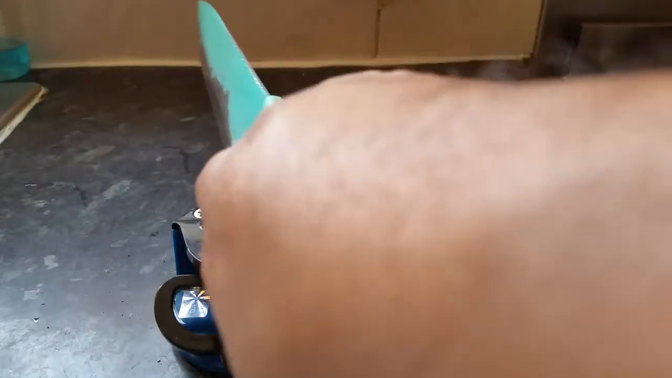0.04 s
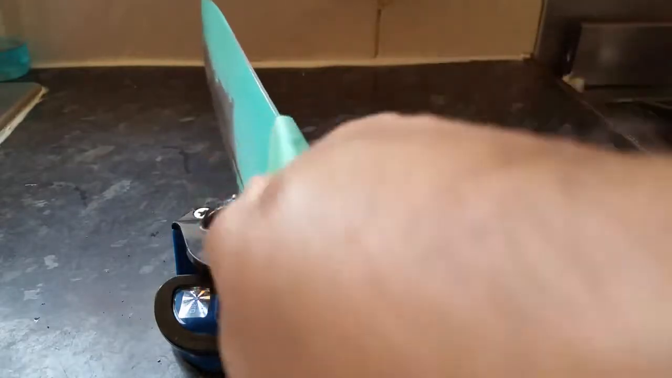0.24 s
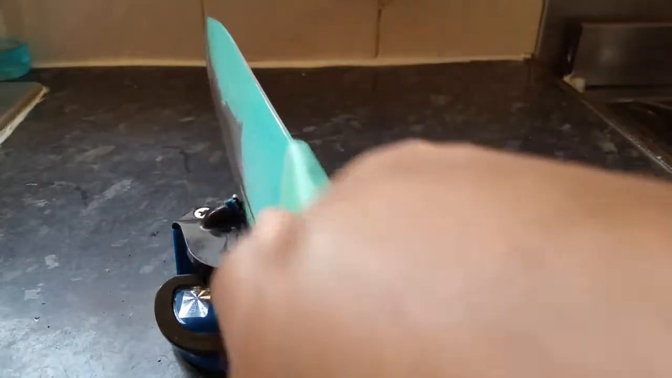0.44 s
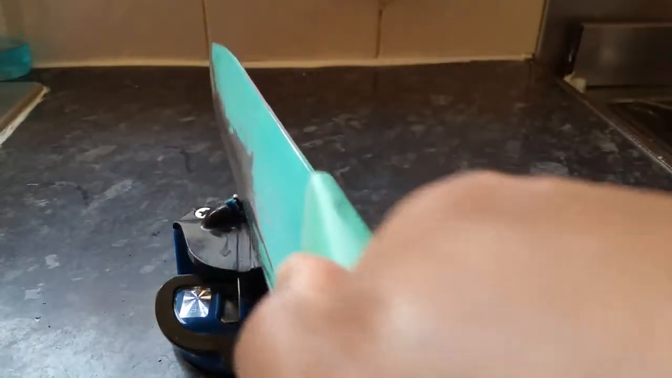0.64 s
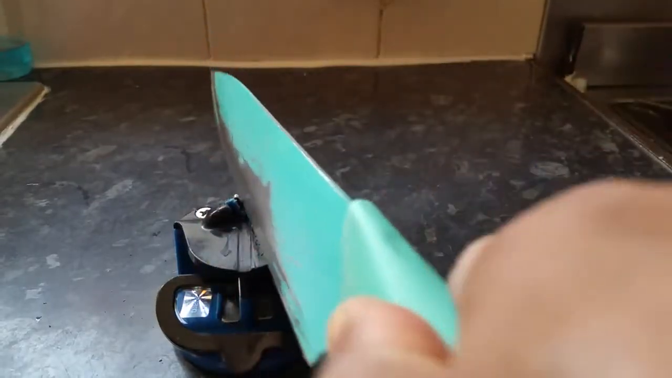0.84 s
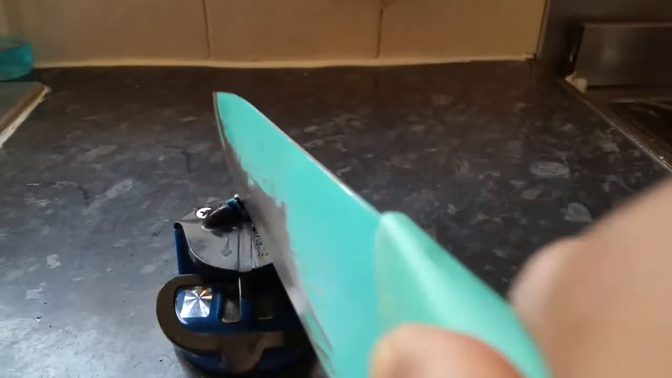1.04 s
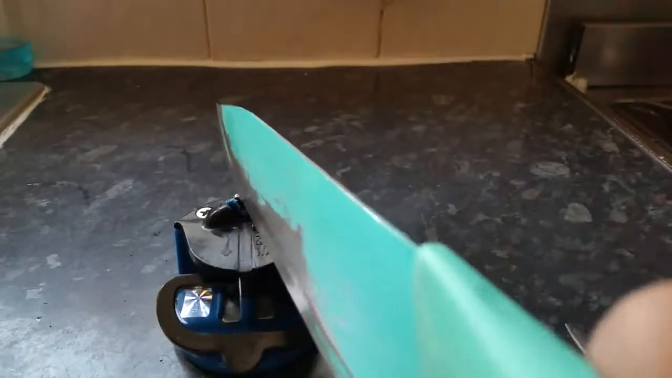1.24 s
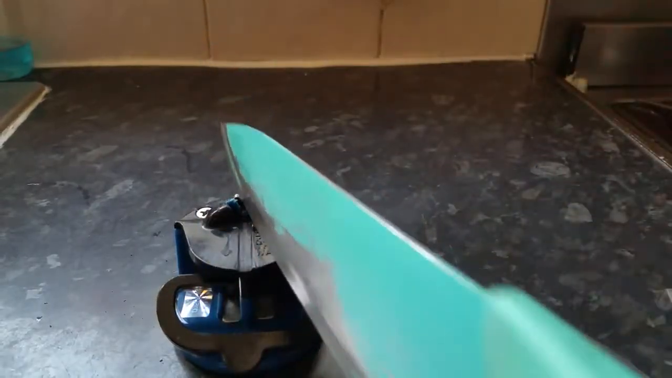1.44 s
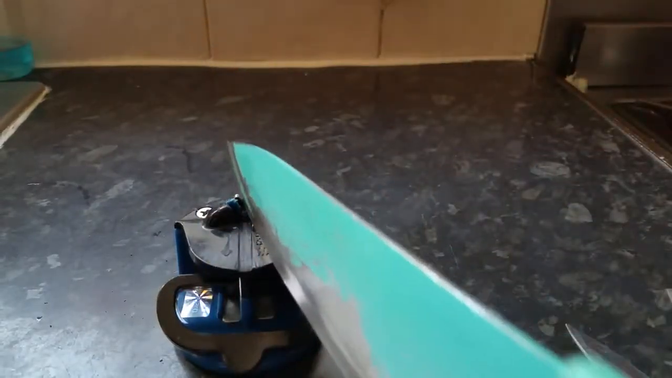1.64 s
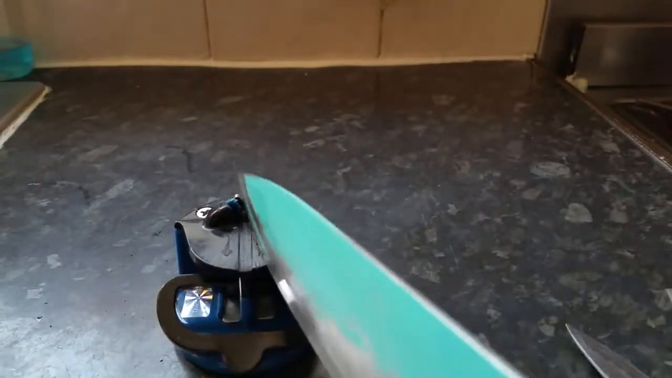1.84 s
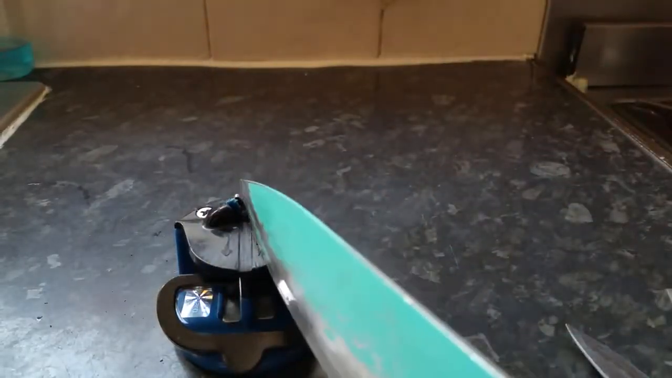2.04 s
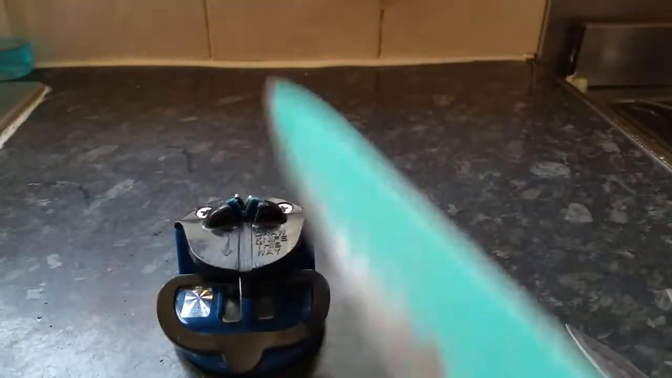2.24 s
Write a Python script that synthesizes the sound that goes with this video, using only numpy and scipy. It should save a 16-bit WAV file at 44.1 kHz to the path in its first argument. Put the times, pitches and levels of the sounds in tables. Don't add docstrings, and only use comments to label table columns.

```python
import sys
import numpy as np
from scipy import signal
from scipy.io import wavfile

SR = 44100
rng = np.random.default_rng(int(sys.argv[2]) if len(sys.argv) > 2 else 0)


def generate_wav(signal):
    frames = np.transpose(np.atleast_2d(signal))
    scaled = np.clip(frames, -1, 1) * 32767
    pcm = np.round(scaled).astype(np.int16)
    wavfile.write(sys.argv[1], SR, pcm)


def nominal_scale(level):
    x = np.asarray(level, float) / 20
    return 10 ** x


N = 101430
TIME = np.arange(N) / SR

# (time [s], grinding level [dB], downward load as thump over grit [dB])
PULL_CURVE = [(0.0, -71.5, 23), (0.144, -69.5, 22.5), (0.236, -48.5, 19), (0.268, -35.5, 19.5),
              (0.322, -27, 11), (0.366, -45, 27), (0.548, -29, 8.5), (0.684, -37, 6), (0.72, -30.5, 13),
              (1.088, -36.5, 3.5), (1.124, -36.5, 1), (1.212, -33.5, 0.5), (1.352, -45, 13.5),
              (1.378, -37.5, 3.5), (1.556, -33.5, 4.5), (1.658, -45, 2.5), (1.75, -34, -8.5),
              (1.935, -41, 4.5)]
# (time [s], grit peak [dB], thump [dB])
HEEL_CATCHES = [(0.1757, -40.5, -42), (0.196, -33.5, -40), (0.2254, -25, -32), (0.2364, -25.5, -36),
                (0.2448, -31, -21), (0.2549, -25, -21), (0.2669, -16.5, -26), (0.2774, -10.5, -29),
                (0.286, -23, -24), (0.306, -12, -17), (0.3156, -14.5, -17), (0.3263, -14.5, -14.5),
                (0.336, -10, -12), (0.398, -15.5, -24), (0.421, -30, -42), (0.431, -18, -15),
                (0.442, -24, -34), (0.457, -18, -33), (0.465, -18.5, -15.5), (0.4738, -16, -17.5),
                (0.483, -10, -9.5), (0.4966, -12, -11), (0.5092, -11, -18), (0.5179, -11, -11.5),
                (0.526, -20, -23), (0.5347, -12, -12), (0.5449, -10.5, -35), (0.55, -13, -17)]
# (time [s], grit peak [dB], thump [dB])
EDGE_SNAGS = [(0.56, -22, -15.5), (0.5685, -12.5, -32), (0.5856, -12, -22.0), (0.595, -13, -16.5),
              (0.6362, -8, -20), (0.6499, -8.5, -26), (0.66, -12.5, -22), (0.6767, -12, -23),
              (0.6964, -23, -23.0), (0.706, -24, -23), (0.7146, -29, -18.5), (0.7325, -12, -22),
              (0.7474, -19, -40), (0.7569, -22, -20), (0.7856, -22, -25), (0.8025, -18, -19),
              (0.8137, -24, -31), (0.8231, -15, -18.5), (0.8491, -10, -23), (0.877, -15.5, -26),
              (0.8864, -15, -36), (0.9234, -16, -28), (0.9322, -17, -39), (0.9402, -19.5, -29),
              (0.9646, -17, -30), (0.984, -18.0, -43), (0.9986, -14.5, -34), (1.0161, -17, -33),
              (1.0276, -18, -45), (1.0521, -14.0, -40), (1.0604, -16.5, -36), (1.0885, -15.5, -36),
              (1.1198, -23, -26), (1.1692, -13, -25), (1.2085, -20, -34), (1.2284, -15.5, -26.5),
              (1.2435, -26, -38), (1.2717, -35, -37), (1.29, -23, -45), (1.3082, -20.5, -32),
              (1.3338, -22.5, -29), (1.3543, -23.5, -40), (1.3627, -28, -32.0), (1.374, -27, -39),
              (1.3821, -26.5, -37), (1.4008, -19, -38), (1.4126, -28, -33), (1.4348, -34, -27.5),
              (1.4794, -15.5, -32), (1.4994, -19, -31), (1.5231, -18, -25), (1.5588, -15.5, -39),
              (1.5797, -23, -32), (1.7005, -24.0, -32), (1.7541, -17.5, -44.0), (1.7708, -22.5, -32),
              (1.7877, -21, -29), (1.8006, -32, -50), (1.8666, -22, -41), (1.9311, -25.5, -30)]
# (start [s], end [s])
SKIP_SPAN = (1.340, 1.354)
# (frequency [Hz], width [Hz], level [dB])
BLADE_RINGS = [(1550, 169, 1.5), (2307, 120, 3), (2767, 155, -0.5), (3136, 215, -4), (3518, 146, 1.5),
               (4264, 61, -5), (4660, 42, -2.5), (5210, 210, 0.5), (6170, 200, 1), (6520, 75, 0),
               (7100, 40, -23), (8320, 500, -9), (9800, 330, -16.5), (10400, 56, -13)]
# (frequency [Hz], level [dB per Hz])
GRIT_COLOUR = [(240, -47), (400, -43), (488, -10), (706, -11.5), (1040, -12.5), (3490, -20.5), (4460, -22),
               (6350, -18.5), (15700, -41)]
# (frequency [Hz], width [Hz], level [dB])
HOLDER_RINGS = [(423, 95, -10.5), (577, 54, -1), (648.5, 115, -8), (758.5, 77, -5.5), (828, 133, -7),
                (978.5, 116, -2.5), (1045, 149, -6), (1175, 30, -17)]
# (frequency [Hz], width [Hz], level [dB])
TIP_RINGS = [(481.3, 35, 3.5), (509.3, 51, 0), (942, 87, -7.5), (8400, 410, -26)]
# (start [s], end [s], lift [dB])
SINGING_SPELLS = [
    (1.148, 1.283, 5),
    (1.499, 1.625, 9.5),
    (1.676, 1.78, 6.5),
    (1.806, 1.976, 5.5),
]
# (frequency [Hz], width [Hz], level [dB])
WORKTOP_RINGS = [(74.4, 13.7, -3.5), (116, 25.5, 2.5), (132.1, 14, 2), (155, 9.5, 1.5), (170.2, 18, -1.5),
                 (202, 11.7, -2), (243, 170, -22.5), (424, 167, -15)]
# (frequency [Hz], width [Hz], level [dB])
HEEL_RINGS = [(296, 10.5, -1.5), (303, 17.3, 2.5), (343.7, 22, -2.5), (370, 26.3, -6.5)]
# (start [s], end [s])
HEEL_LEAVES = (0.83, 1)
# (start [s], full [s], fade [s], end [s], level [dB]); with times out of order the
# second sets in at once at 0.49 s and fades, the third stops while still rising
GUIDE_SCUFFS = [
    (0.28, 0.31, 0.35, 0.395, -35.5),
    (0.49, 0.39, 0.48, 0.74, -43.5),
    (1.45, 2.3, 2.3, 1.963, -51.5),
    (.6, 0.798, 1.25, 3.5, -60),
]
# (frequency [Hz], width [Hz], level [dB])
SCUFF_RINGS = [(10400, 2100, -10), (12100, 260, 4), (12200, 7600, 0), (15400, 1200, -8)]
# (start [s], full [s], fade [s], end [s])
GLIDE_SPAN = (.005, .10, .17, .22)
# (frequency [Hz], width [Hz], level [dB])
GLIDE_RINGS = [(1980, 490, -9.5), (2530, 94, 2.5), (2820, 170, -8), (3700, 150, -27)]
# (time [s], peak level [dB])
TAP_HITS = [
    (0.043, -50.5),
    (2.2342, -34),
]
# (frequency [Hz], level [dB], 60 dB decay [s])
TAP_MODES = [(529, 1, 0.1), (586, -0.5, 0.11), (1050, -7, 0.032), (1090, 3, 0.035), (1320, -2, 0.023),
             (1550, 0, 0.025), (2040, -11, 0.053), (2120, -9, 0.066), (2460, -8, .01), (2700, 4.5, 0.016),
             (3250, -2, 0.013), (4340, -8, 0.0087), (5200, -7, 0.0079), (8350, -11, 0.0054)]
# (frequency [Hz], level [dB per Hz])
ROOM_COLOUR = [(18, -43), (30, -1.5), (169, -15.5), (836, -24.5), (1340, -32), (1530, -35.5), (7740, -45.5),
               (8600, -51), (15700, -49)]
# (frequency [Hz], width [Hz], level [dB])
DRONE_RINGS = [(306.4, 20, 20.5), (165, 63, 17)]
# (frequency [Hz], left-right likeness [clipped to 0..1])
STEREO_LIKENESS = [(60, 3.5), (200, 4.5), (500, 0.6), (2000, 0.5), (5000, 0.7), (10000, 0.12)]
# (frequency [Hz], left over right [dB])
STEREO_BALANCE = [(110, 4.2), (300, 1.1), (2500, .7), (4400, 4.2), (6200, .5), (8200, 9.2), (10000, 5.5),
                  (15000, 5.2)]

JUDDER_END_S, LEAVE_S = 0.55, 1.9357
SLIPS_PER_S, SLIP_JITTER, SLIP_SPREAD_DB, SNAG_CLEAR_S = 95, 0.31, -4, 0.007
SLIP_DECAY_S, SLIP_SHARE, SLIPS_FADE_DB_PER_S = 0.0043, 0.35, 1.5
STICK_S, STICK_SHARE = 0.0026, 0.3
TEAR_RISE_S, TEAR_HOLD_S, TEAR_FALL_S = 0.00061, 0.0036, 0.0026
GRAINS_PER_S, GRAIN_SPREAD_DB, SKIP_DB = 6000, 1, -17
LEAVE_DB_PER_S, BRUSH_DB, BRUSH_DB_PER_S = 2494.5, 13, 128
TICK_DB, TICKS_FADE_DB_PER_S = 11, 3
BLADE_DB, GRIT_DB, HOLDER_DB, HOLDER_FADES_DB_PER_S = 8, 15.5, 24, 1.5
TIP_DB, TIP_GROWS_DB_PER_S = 13.5, 3
RUMBLE_SHARE, UNLOAD_DB_PER_S, THUMP_DB, THUMP_CUT_HZ = 0.34, 137, 16.5, 1150
WORKTOP_DB, HEEL_LOSS_DB = 22, -5.5
JOLT_HZ, JOLT_DB, JOLT_WIDTH_S, JOLT_LAG_S = 130, -0.5, 0.0034, 0.0032
GLIDE_DB = -41.5
TAP_RISE_S, TAP_CRACK_S, TAP_CRACK_DB = 0.0027, 0.0014, -10.5
KITCHEN_T60_S, WALL_CUT_HZ, KITCHEN_DB = 0.37, 10500, -15
TONE_DB = -55.5
RING_WANDER_DB, WANDER_HZ = 1.2, 5.9
PORT_LAG_SAMPLES, PORT_SHARE = 7, 0.043


def rms_one(x):
    return x / np.sqrt(np.mean(x ** 2) + 1e-20)


def at_hz(points, hz):
    table_hz, value = np.transpose(points)
    return np.interp(np.log(hz), np.log(table_hz), value)


def noise_pair():
    return rng.standard_normal((2, N))


def drift(rate):
    r = np.exp(-2 * np.pi * rate * 40 / SR)
    slow = signal.lfilter([1], [1, -2 * r, r * r], rng.standard_normal(N // 40 + 2002))
    slow = slow[2000:]
    return np.interp(np.arange(N) / 40, np.arange(len(slow)), rms_one(slow - slow.mean()))


def spread(pair, hz):
    alike = np.clip(at_hz(STEREO_LIKENESS, hz), 0, 1)
    sides = np.sqrt(1 + alike) * pair[0] + np.sqrt(1 - alike) * pair[1] * [[1], [-1]]
    return sides * nominal_scale(at_hz(STEREO_BALANCE, hz) * np.array([[0.5], [-0.5]]))


def ports(pair):
    late = np.roll(pair[0], PORT_LAG_SAMPLES)
    return np.array([pair[0], np.sqrt(PORT_SHARE) * late + np.sqrt(1 - PORT_SHARE) * pair[1]])


def body(pair, rings):
    out = 0
    for k, (hz, width, db) in enumerate(rings):
        r = np.exp(-np.pi * width / SR)
        poles = [1, -2 * r * np.cos(2 * np.pi * hz / SR), r * r]
        rung = signal.lfilter((1 - r * r) / 2 * np.array([1, 0, -1]), poles, pair + 1e-18)
        strength = nominal_scale(db + RING_WANDER_DB * drift(WANDER_HZ))
        out = out + (-1) ** k * strength * spread(rung, hz)
    return out


def coloured(pair, spectrum):
    edges = 30 * 2 ** np.arange(0, 9.6, 0.5)
    out = 0
    for k, (lo, hi) in enumerate(zip(edges, edges[1:])):
        centre = np.sqrt(lo * hi)
        band = signal.sosfilt(signal.butter(2, [lo, hi], "band", fs=SR, output="sos"), pair)
        out = out + nominal_scale(at_hz(spectrum, centre)) * (-1) ** k * spread(band, centre)
    return out


def slips():
    draw = rng.standard_normal((400, 2))
    s = JUDDER_END_S + np.cumsum(np.exp(SLIP_JITTER * draw[:, 0])) / SLIPS_PER_S
    loose, hard, thumps = np.zeros((3, N))
    at, db, thump_db = np.transpose(HEEL_CATCHES + EDGE_SNAGS)
    clear = np.abs(s[:, None] - at).min(axis=1) > SNAG_CLEAR_S
    free = (s < LEAVE_S) & clear
    loose[(s[free] * SR).astype(int)] = nominal_scale(SLIP_SPREAD_DB * draw[free, 1])
    pull_s, pull_db, _ = np.transpose(PULL_CURVE)
    catch = (at * SR).astype(int)
    hard[catch] = nominal_scale(db - np.interp(at, pull_s, pull_db) - 12.5)
    thumps[catch] = nominal_scale(thump_db)
    return loose, hard, thumps


def stick_and_tear(hard):
    t = np.arange(800) / SR
    stop = 1 + np.exp(np.minimum((t - TEAR_HOLD_S) / TEAR_FALL_S * 2, 50))
    tear = np.minimum(t / TEAR_RISE_S, 1) / stop
    stick = np.convolve((hard > 0)[::-1], np.exp(-(t / STICK_S) ** 2))[:N][::-1]
    return 1 - STICK_SHARE * np.minimum(stick, 1), np.convolve(hard, tear)[:N]


def edge_motion(loose, hard):
    stuck, torn = stick_and_tear(hard)
    fall = np.exp(-1 / (SLIP_DECAY_S * SR))
    smoother = nominal_scale(-SLIPS_FADE_DB_PER_S * TIME)
    bursts = signal.lfilter([1], [1, -fall], smoother * loose + 1e-18) + nominal_scale(-2.5) * torn
    return stuck, bursts


def grind(loose, hard, stuck, bursts):
    pull_s, pull_db, _ = np.transpose(PULL_CURVE)
    level_db = np.interp(TIME, pull_s, pull_db)
    gone = np.maximum(TIME - LEAVE_S, 0)
    sizes = nominal_scale(GRAIN_SPREAD_DB * np.minimum(rng.exponential(1, (2, N)), 5))
    sizes = sizes * rng.choice([-1, 1], (2, N))
    grains = rms_one(sizes * (rng.random((2, N)) < GRAINS_PER_S / SR))
    skip_db = SKIP_DB * ((TIME > SKIP_SPAN[0]) & (TIME < SKIP_SPAN[1]))
    leave_db = np.minimum(LEAVE_DB_PER_S * gone, BRUSH_DB + BRUSH_DB_PER_S * gone)
    swell = nominal_scale(level_db + skip_db - leave_db) * ((1 - SLIP_SHARE) * stuck + 2 * SLIP_SHARE * bursts)
    clicks = signal.lfilter([0.35, 0.7, 0.35], [1, -0.45], loose + nominal_scale(-0.5) * hard)
    ticks = nominal_scale(TICK_DB + level_db - TICKS_FADE_DB_PER_S * TIME) * clicks * [[1], [0]]
    grit = ports(grains * swell + ticks)
    loose_grit = ports(grains[:, ::-1] * swell + ticks)
    sings_db = 0
    for start, end, db in SINGING_SPELLS:
        sings_db = sings_db + db * np.sin(np.pi * np.clip((TIME - start) / (end - start), 0, 1))
    blade = nominal_scale(BLADE_DB) * body(grit, BLADE_RINGS)
    hiss = nominal_scale(GRIT_DB) * coloured(loose_grit, GRIT_COLOUR)
    holder = nominal_scale(HOLDER_DB - HOLDER_FADES_DB_PER_S * TIME) * body(grit, HOLDER_RINGS)
    tip = nominal_scale(TIP_DB + sings_db + TIP_GROWS_DB_PER_S * TIME) * body(loose_grit, TIP_RINGS)
    return blade + hiss + holder + tip


def worktop(loose, thumps):
    pull_s, pull_db, load_db = np.transpose(PULL_CURVE)
    push_db = np.interp(TIME, pull_s, pull_db) + np.interp(TIME, pull_s, load_db)
    push_db = push_db - UNLOAD_DB_PER_S * np.maximum(TIME - LEAVE_S, 0)
    push = rms_one(loose) * (1 - RUMBLE_SHARE) + RUMBLE_SHARE * noise_pair()
    push = push * nominal_scale(push_db) + nominal_scale(THUMP_DB) * thumps
    push = signal.sosfilt(signal.butter(2, THUMP_CUT_HZ, fs=SR, output="sos"), push)
    heel_gain = np.interp(TIME, HEEL_LEAVES, [1, nominal_scale(HEEL_LOSS_DB)])
    return nominal_scale(WORKTOP_DB) * (body(push, WORKTOP_RINGS) + heel_gain * body(push, HEEL_RINGS))


def jolts(thumps):
    u = (np.arange(600) / SR - JOLT_LAG_S) / (JOLT_WIDTH_S / 2)
    shoves = nominal_scale(JOLT_DB) * np.convolve(thumps, (1 - 2 * u * u) * np.exp(-u * u))[:N]
    return spread([shoves, np.roll(shoves, 60)], JOLT_HZ)


def scuffs(stuck, bursts):
    level = sum(np.interp(TIME, s, [0, 1, 1, 0]) * nominal_scale(db) for *s, db in GUIDE_SCUFFS)
    return body(level * noise_pair() * (0.65 * stuck + 0.99 * bursts), SCUFF_RINGS)


def glide():
    level = np.interp(TIME, GLIDE_SPAN, [0, 1, 1, 0]) * nominal_scale(GLIDE_DB)
    return body(level * noise_pair(), GLIDE_RINGS)


def taps():
    out = np.zeros(N)
    for s, db in TAP_HITS:
        t = np.maximum(TIME - s, 0)
        crack = signal.lfilter([0.3, 0.6, 0.3], [1, -0.5], rng.standard_normal(N))
        out += nominal_scale(db + TAP_CRACK_DB) * (TIME > s) * np.exp(-t / TAP_CRACK_S) * crack
        for hz, mode_db, t60 in TAP_MODES:
            swell = 1 - np.exp(-t * hz / 1000 / TAP_RISE_S)
            out += nominal_scale(db + mode_db - 6 - 60 * t / t60) * np.sin(2 * np.pi * hz * t) * swell
    return out * nominal_scale(np.array([[0.6], [-0.6]]))


def kitchen(x):
    out = np.zeros((2, N))
    dull = np.exp(-2 * np.pi * WALL_CUT_HZ / SR)
    lags = (rng.uniform(0.012, 0.035, 16) * SR).astype(int)
    for k, lag in enumerate(lags):
        loop, state = x.copy(), [0.0]
        gain = nominal_scale(-60 * lag / SR / KITCHEN_T60_S)
        for i in range(lag, N, lag):
            back, state = signal.lfilter([gain * (1 - dull)], [1, -dull], loop[i - lag:i], zi=state)
            loop[i:i + lag] += back[:N - i]
        out[k % 2] += (loop - x) * (-1) ** (k // 2)
    return out


def room_tone():
    air = rms_one(coloured(rng.standard_normal((2, N + 8000)), ROOM_COLOUR)[:, 8000:])
    drone = body(noise_pair(), DRONE_RINGS)[:, ::-1]
    return nominal_scale(TONE_DB) * (air + nominal_scale(np.interp(TIME, [0, 0.3], [2.5, 0])) * drone)


def scene():
    loose, hard, thumps = slips()
    stuck, bursts = edge_motion(loose, hard)
    near = grind(loose, hard, stuck, bursts) + worktop(loose, thumps) + jolts(thumps)
    near = near + scuffs(stuck, bursts) + glide() + taps()
    send = signal.sosfilt(signal.butter(1, 150, "high", fs=SR, output="sos"), near.mean(axis=0))
    return near + nominal_scale(KITCHEN_DB) * kitchen(send) + room_tone()


def top_cut(x):
    return signal.sosfilt(signal.butter(12, 15860, fs=SR, output="sos"), x)


def record(dry):
    x = signal.sosfilt(signal.butter(3, 55, "high", fs=SR, output="sos"), dry)
    x = 0.85 * np.tanh(x / 0.85)
    x = signal.sosfilt(signal.ellip(10, 0.5, 70, 15700, fs=SR, output="sos"), x)
    return top_cut(x)


dry = scene()
out = record(dry)
generate_wav(out)
```